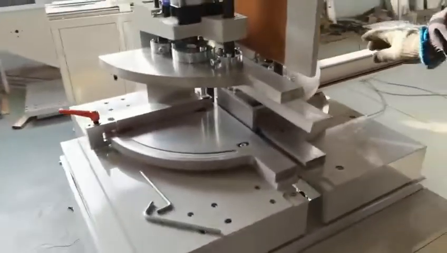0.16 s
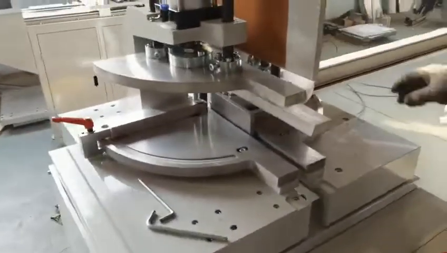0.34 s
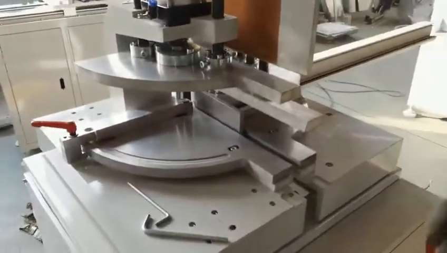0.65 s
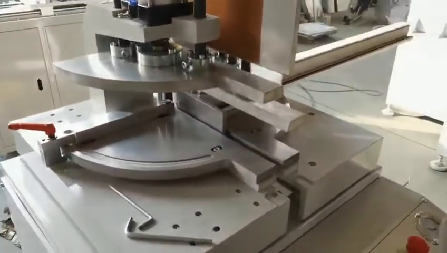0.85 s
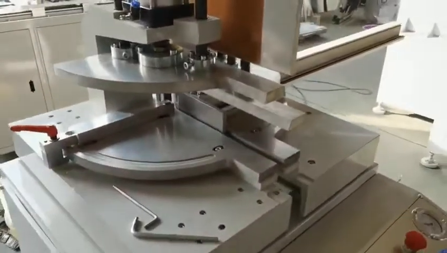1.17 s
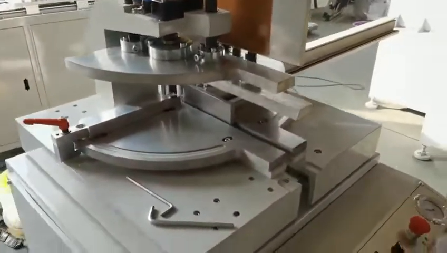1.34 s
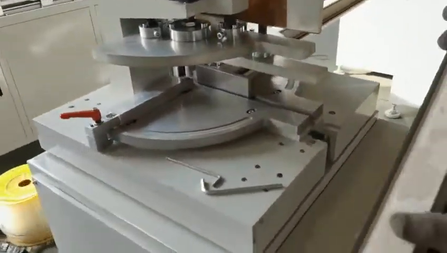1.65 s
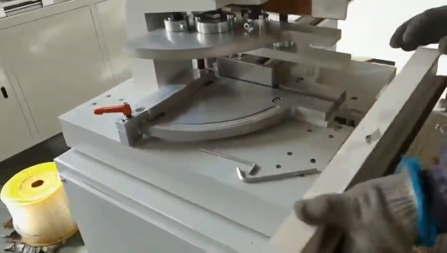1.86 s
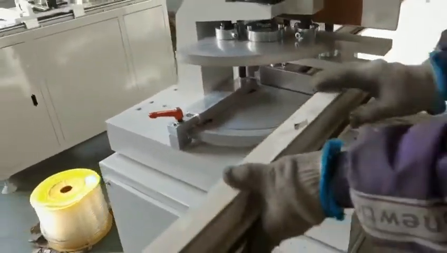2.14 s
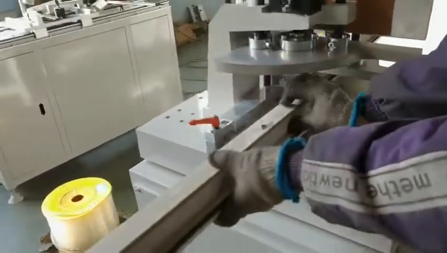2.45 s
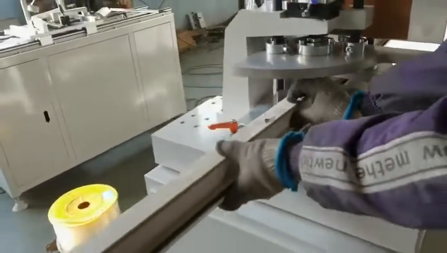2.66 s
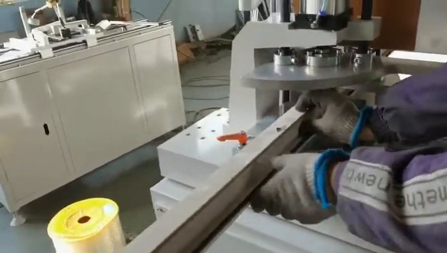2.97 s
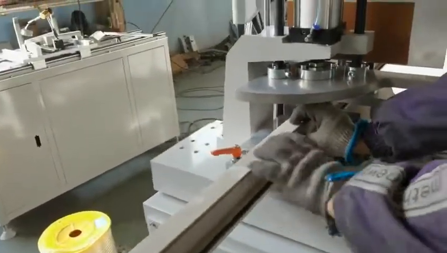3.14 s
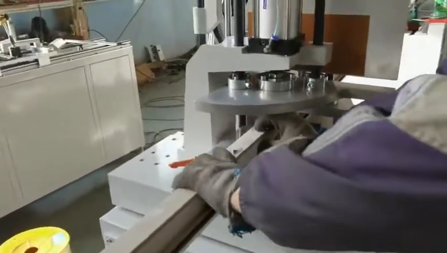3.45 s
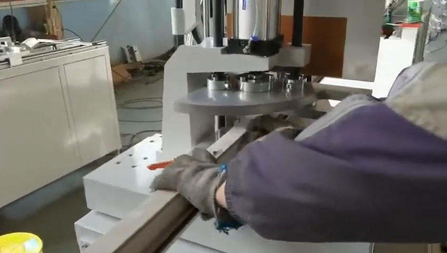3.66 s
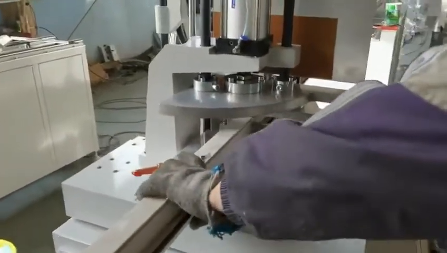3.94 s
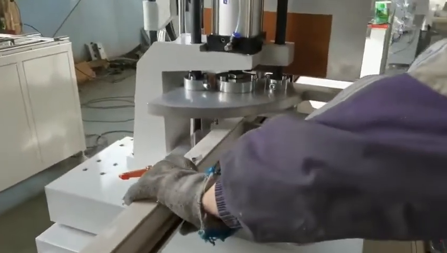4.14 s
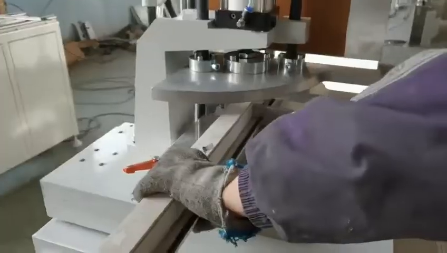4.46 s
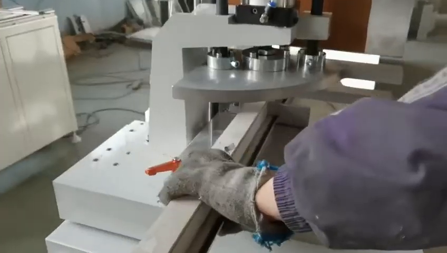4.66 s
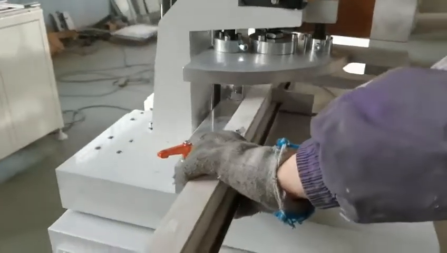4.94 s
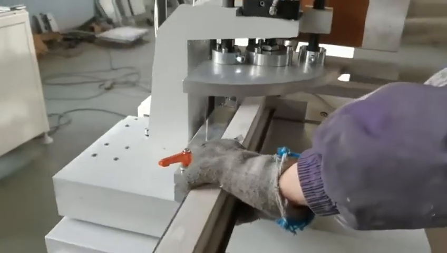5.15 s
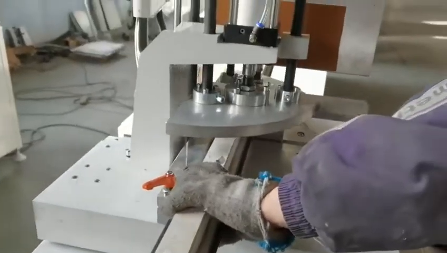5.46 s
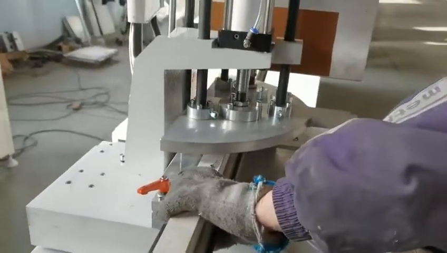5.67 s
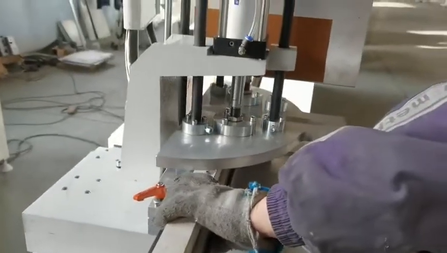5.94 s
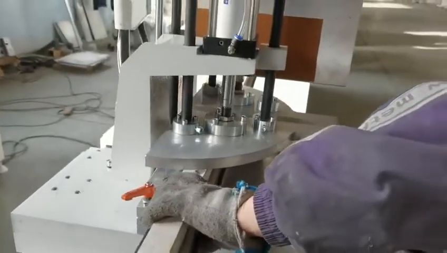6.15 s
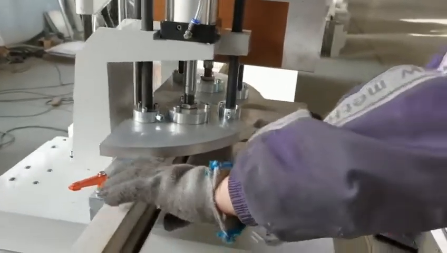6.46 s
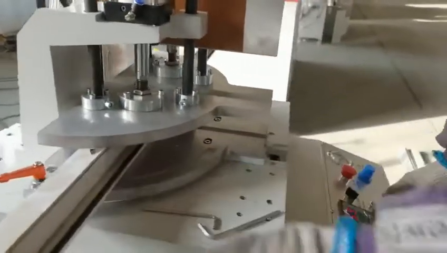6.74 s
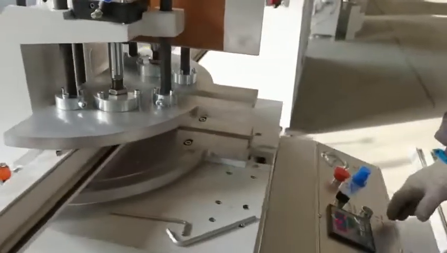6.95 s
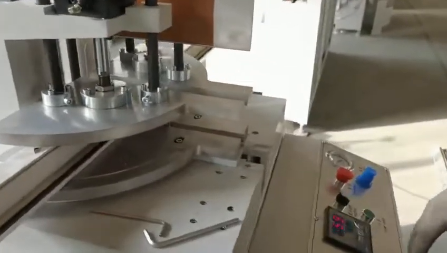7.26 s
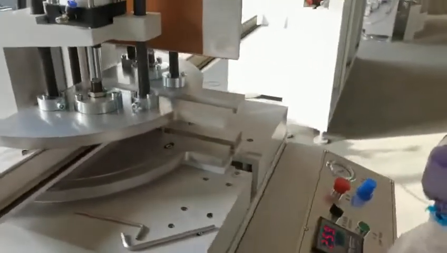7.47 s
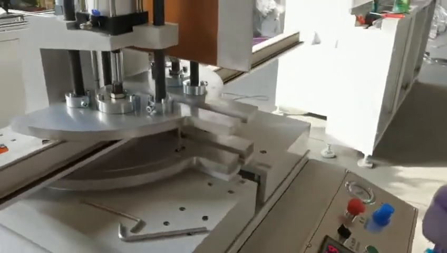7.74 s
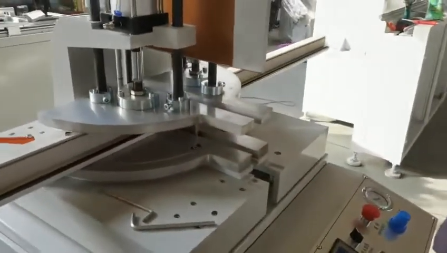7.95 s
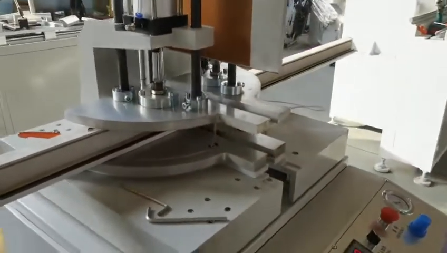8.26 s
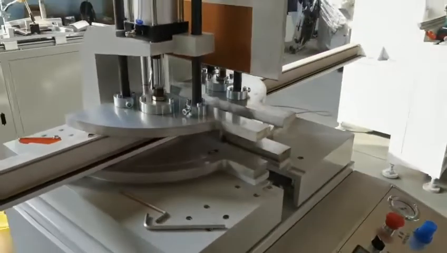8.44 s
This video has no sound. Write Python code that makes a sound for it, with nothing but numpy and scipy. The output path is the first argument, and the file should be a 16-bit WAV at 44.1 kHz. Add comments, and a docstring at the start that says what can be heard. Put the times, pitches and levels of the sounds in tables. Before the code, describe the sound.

Close up in a rumbling workshop, a metal bar scrapes and clacks into place before valves thump, air blasts hiss and pistons clunk.

```python
"""A pneumatic press for window profiles cycles in a large workshop, heard by a phone close by.
Valves thud as damped modes and vent coloured noise that dies away; pistons clunk as struck modes
plus rattling noise. A hollow profile rasps over the table (grainy noise) and knocks on it (a crack
and ringing modes). A fitting leaks, the hall rumbles in noise bands, a far tool whirrs in narrow ones."""
import sys
import numpy as np
from scipy import signal
from scipy.fft import rfft, irfft
from scipy.io import wavfile
from scipy.ndimage import uniform_filter1d, minimum_filter1d

SR = 44100
rng = np.random.default_rng(int(sys.argv[2]) if len(sys.argv) > 2 else 0)


def makeup_ratio(level_db):
    """Linear amplitude ratio for a level in decibels (20 dB per factor of ten)."""
    decades = np.asarray(level_db, float) / 20
    return 10 ** decades


def store_wav(level_fs):
    """Save 16-bit WAV to argv[1]."""
    pcm = np.round(np.clip(np.atleast_2d(level_fs), -1, 1) * 32767)
    wavfile.write(sys.argv[1], SR, pcm.T.astype(np.int16))


N = 379260
HZ = np.maximum(np.fft.rfftfreq(N, 1 / SR), 1)
TIME = np.arange(N) / SR

# air seeping from a fitting: (time [s], level [dB])
LEAK_LEVEL = [(0, -67), (.4, -48), (1, -41.5), (1.9, -48), (2.85, -49.5), (5.9, -32.5), (6.85, -31.5),
              (7.1, -35.5), (8, -38), (8.6, -47)]
# colour of the seeping air: (frequency [Hz], relative density [dB per Hz])
LEAK_COLOUR = [(1060, -59), (1800, -27), (2080, -12.5), (2330, -17.5), (2980, -12.5), (3670, -14),
               (6070, -6), (7560, -7), (8520, 2), (11600, -24.5), (16000, -35)]
# gloves and profile rubbing over the table:
# (hardest at [s], build-up [s], let-off [s], bright rasp [dB], dull rasp re bright [dB])
STROKES = [(.22, .02, 0.15, -50, -29), (.505, 0.026, 0.05, -27, -15), (.79, 0.046, 0.074, -38, -42),
           (.92, 0.028, 0.15, -41.5, -24), (1.19, 0.034, 0.07, -27, -10.5),
           (1.662, 0.049, 0.036, -22.5, -26), (1.745, 0.038, 0.026, -30, -8.5),
           (2.127, 0.018, 0.021, -32.5, -23), (2.35, 0.027, 0.045, -36, -21),
           (2.45, 0.049, 0.049, -41, -5.5), (2.56, 0.023, 0.054, -43, -8), (2.64, .02, 0.028, -37.5, -3),
           (6.8, 0.04, 0.075, -32.5, -24), (6.921, 0.014, 0.033, -24.5, -8), (7.16, 0.033, 0.033, -45, -23),
           (7.71, 0.025, 0.053, -32, -7.5)]
# profile dragged so that it rings: (hardest at [s], build-up [s], let-off [s], level [dB])
DRAGS = [(.514, 0.015, .05, -54.5), (1.19, 0.031, 0.092, -31), (2.348, .015, 0.027, -42.5),
         (2.5, 0.011, 0.009, -37.5), (2.6, 0.036, 0.069, -41.5), (6.936, 0.005, 0.011, -42.5)]
# colour of rubbing and of cracks: (frequency [Hz], relative density [dB per Hz])
RASP_COLOUR = [(880, -41), (1500, -29), (1830, -18.5), (2460, -12.5), (3280, -18.5), (4000, -13.5),
               (5440, -6.5), (7030, -12), (8400, 0), (10900, -22), (11700, -33.5), (14200, -34.5),
               (16000, -42)]
# where hands and fitting lie as the phone moves: (time [s], left re right [dB])
CLOSE_PAN = [(0, 0), (.8, -4), (1.2, -0.5), (1.7, -1.5), (2.5, 0.5), (6.5, -0.5), (6.9, -0.5), (8, 0.5)]
# work in the hall: (time [s], level change [dB])
BUSY = [(0, 2), (1, 6), (1.9, 0), (2.8, 4.5), (4.1, 5.5), (5.4, -1.5), (6.3, -1.5), (6.9, 4.), (7.5, 1),
        (8.6, 3.5)]
# colour of the hall noise: (frequency [Hz], relative density [dB per Hz])
HALL_COLOUR = [(15, -34), (25, -38), (54, 4), (82, 0.5), (209, -7), (375, -13), (546, -11.5), (1010, -16.5),
               (1290, -10.5), (1500, -12.5), (1950, -9.5), (3300, -120)]
# swells of a far tool: (loudest at [s], build-up [s], let-off [s], level [dB], pitch [Hz])
WHIRR = [(.12, .12, 0.095, -58, 1290), (.4, 0.033, 0.37, -53, 2600), (.64, .11, 0.16, -45.5, 1780),
         (.97, 0.064, .07, -61, 2730), (2.79, 0.028, 0.15, -48.5, 1126), (4.21, .015, .26, -42.5, 1258),
         (4.22, .02, 0.3, -52, 1042), (6.6, .03, .1, -50, 1240), (7.62, .05, 0.082, -50.5, 1535)]
# profile knocking on steel:
# (time [s], relative level [dB], crack re level [dB], left re right [dB], hardness [dB per octave])
KNOCKS = [(0.398, -36, 9, -11, 9.5), (1.112, -9.5, 18, 0, -14), (1.919, -43, 16, -3, -5),
          (2.308, -15, 8.5, 0.5, 10), (2.332, -19, -7, 5, -6), (2.347, -21, 10, -6, -5),
          (2.443, -28.5, 10, -9, -3), (2.494, -16.5, 0, 1, -6), (2.558, -21.5, -8, -2, -22),
          (2.626, -9.5, 7.5, -5, 9), (6.892, -38, 38, -4, -6), (6.913, -35.5, 33, -11, -8),
          (7.954, -36, 27, -4, -9)]
# modes of the profile: (frequency [Hz], width before damping [Hz], relative level [dB])
PROFILE_MODES = [(245, 51, 2), (540, 49, -19), (807, 66, -5.5), (940, 29, -3), (1296, 160, 0),
                 (1620, 160, -1), (2000, 67, -1), (2460, 13, -11.5), (2630, 17, -9.5), (3600, 83, -15)]
# valves and pistons shaking frame and floor:
# (time [s], relative level [dB], pitch [Hz], t60 [s], rise time constant [s])
BOOMS = [(.882, -50, 151, 0.27, .005), (1.185, -26, 245, 0.29, 0.0063), (2.854, -22, 161, 0.43, 0.0021),
         (2.853, -24, 230, 0.11, 0.0012), (2.929, -25.5, 250, 0.21, 0.0064),
         (3.33, -27, 518.5, 0.29, 0.0092), (3.322, -27, 240, 0.41, 0.0087), (3.345, -26, 109, 0.22, 0.009),
         (3.83, -16, 150, 0.2, 0.0016), (3.87, -19.5, 282, 0.37, 0.013), (3.86, -30, 400, 0.33, .02),
         (2.856, -34, 380, 0.15, 0.024), (3.989, -29.5, 210, 1, 0.085), (4.884, -26.5, 165, 0.17, 0.0043),
         (5.766, -31.5, 290.6, 0.19, 0.0043), (5.77, -36, 450, .2, .006), (5.78, -23.5, 99.6, 0.28, 0.016),
         (6.738, -32, 106, 0.44, 0.0048), (6.76, -34, 561, 0.19, 0.0071), (7.956, -22, 159.4, 0.075, 0.003),
         (8.085, -29, 246, 0.4, 0.0055), (8.311, -24.5, 300, 0.66, 0.0064), (8.394, -13, 255, 0.14, 0.004),
         (8.37, -28.5, 85, .7, 0.016), (8.42, -22.5, 147, 0.63, 0.0095)]
# valves opening: (time [s], spit [dB], spit let-off [s], surge [dB], surge t60 [s])
VENTS = [(2.852, -30, 0.013, -8, 0.42), (3.832, -27, 0.0087, -10, 0.64), (4.888, -9, 0.026, -28, 0.52),
         (7.969, -11.5, 0.019, -17, 0.93)]
# each cylinder emptying through its silencer:
# (hiss [dB], silencer ring [dB], roar [dB], sag [dB per s], runs dry at [s])
EMPTYING = [(-23.5, -31.5, -36, 3.5, 3.83), (-19, -26, -32.5, 8, 4.885), (-16.5, -25.5, -35, 4, 5.84),
            (-48, -23.5, -47, 15, 8.45)]
# extra fall once dry, cut off by the next valve or left to die: one per vent [dB per s]
RUN_DRY_DB_PER_S = [900, 920, 40.7, 114]
# silencer whistles, one list per vent: (frequency [Hz], width [Hz], level over the air noise [dB])
WHISTLES = [
    [(5150, 250, 3.5), (6180, 300, 3), (8480, 400, 2)],
    [(4300, 200, 2), (6100, 500, 2), (8600, 400, 1.5)],
    [(4750, 300, 3), (5400, 150, 3), (6030, 150, 4), (6600, 200, 2), (8880, 150, 2), (9380, 100, 3)],
    [(4300, 200, 4), (4860, 120, 4), (5170, 220, 6), (5900, 500, 2), (6600, 120, 3), (7200, 120, 3),
     (8560, 120, 2.5)],
]
# position of each exhaust: left re right [dB]
VENT_PAN_DB = [0.25, 0.96, -0.09, -1.6]
# colour of the vented air: (frequency [Hz], relative density [dB per Hz])
AIR_COLOUR = [(710, -36), (1200, -11.5), (1790, -16.5), (1930, -11.5), (2060, -11.5), (2230, -11),
              (3250, -11.5), (3870, -14.5), (5350, -9.5), (7410, -10.5), (8630, -4), (11100, -21.5),
              (11800, -28), (15200, -32.5), (16000, -48)]
# pistons meeting their stops:
# (time [s], relative level [dB], treble re level [dB], dull rattle t60 [s], hardness [dB per octave])
CLANKS = [(3.313, -21, 10, 0.12, 0.5), (5.76, -30, 3, 0.11, -7), (6.737, -37.5, -19, 0.41, -7),
          (7.956, -58, 31, 0.4, -22), (8.08, -21, 13.5, 0.39, 4), (8.096, -24, 7.5, 0.19, -6),
          (8.386, -28, 11, .12, 0.), (8.398, -21, -2, 0.25, -14)]
# modes of the steel frame: (frequency [Hz], width before damping [Hz], relative level [dB])
FRAME_MODES = [(560, 77, -4), (905, 120, -12), (1470, 100, -8), (1990, 120, -27), (1900, 44, 3.5),
               (2370, 57, -7), (2660, 50, -22), (2640, 42, 3), (3100, 41, -1), (4160, 55, -16),
               (4230, 33, 10), (4600, 100, 10), (5030, 57, 0)]
# likeness of the ports in diffuse noise: (frequency [Hz], left-right correlation [0-1])
LIKENESS = [(60, 0.98), (180, 0.96), (550, 0.69), (1650, 0.026), (4970, 0.018), (15000, 0.01)]
# colour difference of the ports: (frequency [Hz], left re right [dB])
PORT_BALANCE = [(60, 0), (200, 0.9), (380, 1), (700, 2), (1290, 0), (2380, -1.5), (3400, 0), (4700, -4.5),
                (6000, -4.5), (7100, -4), (8000, -0.5), (9200, 0), (11000, 4.5), (13000, -10.5)]

RESTING_DB, RESTING_DULL_DB = -55, -2.5   # light contact between strokes; its dull part re bright
RUMBLE_DB, DRONE_DB, MURMUR_DB = -53.5, -55, -55
MURMUR_FOLLOWS = 0.51   # share of the BUSY dB
WHIRR_WIDTH_HZ = 186
OPENING_S, ROAR_BUILDS_S = 0.034, 0.038   # time constants
SPIT_ATTACK_S, SPUTTER_DB = 0.001, 2
SURGE_RING_DB, SURGE_ROAR_DB, SURGE_WASH_DB = -15.5, -16.5, -26   # shares of spit and surge
ECHO_T60_S = 0.07
HALL_T60_S, HALL_DB = 0.79, -12
LIMIT_DB, RELEASE_DB_PER_S = -4, 114


def rms_one(x):
    """Scale to unit power."""
    return x / np.sqrt(np.mean(x ** 2) + 1e-20)


def in_time(rows):
    """Read a (time, value) curve at every sample."""
    return np.interp(TIME, *np.transpose(rows))


def at_hz(points):
    """Read a (frequency, value) table on the frequency grid, log-spaced."""
    hz, value = np.transpose(points)
    return np.interp(np.log(HZ), np.log(hz + 1), value)


def drift(rate_hz):
    """Slow random wandering, spread 1: noise through two poles, run at SR / 40."""
    r = np.exp(-2 * np.pi * rate_hz * 40 / SR)
    slow = signal.lfilter([1], [1, -2 * r, r * r], rng.standard_normal(N // 40 + 2002))
    slow = rms_one(slow[2000:])
    return np.interp(np.arange(N) / 40, np.arange(len(slow)), slow)


def swell(s, build_s, let_off_s):
    """Bell-shaped push: builds up to s, then lets off."""
    return np.exp(-.5 * ((TIME - s) / np.where(TIME < s, build_s, let_off_s)) ** 2)


def burst(s, t60_s, rise_s):
    """Envelope that rises quickly at s and dies exponentially."""
    after = np.maximum(TIME - s, 0)
    return (1 - np.exp(-after / rise_s)) * makeup_ratio(-60 * np.minimum(after / t60_s, 3))


def panned(x, pan_db):
    """Shift level between left and right."""
    return x * makeup_ratio(pan_db * np.array([[.5], [-.5]]))


def diffuse(near, grain_db=0):
    """Spectrum of stereo noise: a near share via short echoes off the machine, the rest hall field."""
    white = rfft(rng.standard_normal((3, N)) * makeup_ratio(grain_db * rng.standard_normal(N)))
    size = round(2 * ECHO_T60_S * SR)
    echoes = rng.standard_normal((2, size)) * makeup_ratio(-60 * TIME[:size] / ECHO_T60_S)
    echoes = rfft(echoes / np.sqrt(np.sum(echoes ** 2, axis=1, keepdims=True)), N)
    echoes = echoes / np.abs(echoes) ** .4   # many paths even out the deepest ripples
    mid, side = np.sqrt(near) * white[0] * echoes + np.sqrt(1 - near) * white[1:]
    alike = np.clip(at_hz(LIKENESS), 0, .99)
    return np.sqrt(1 + alike) * mid + np.sqrt(1 - alike) * side * [[1], [-1]]


def band(noise, gain, low_hz, high_hz):
    """Coloured noise within a band, scaled to unit power."""
    inside = 1 / np.sqrt((1 + (low_hz / HZ) ** 12) * (1 + (HZ / high_hz) ** 12))
    return rms_one(irfft(noise * gain * inside, N))


def resonances(peaks, base_db):
    """Magnitude of a set of peaks over a flat base."""
    gain = makeup_ratio(base_db)
    for hz, wide_hz, db in peaks:
        gain = gain + makeup_ratio(db) / np.sqrt(1 + (2 * (HZ - hz) / wide_hz) ** 2)
    return gain


def ring(clicks, hz, t60_s):
    """Two-pole resonator: a unit click starts a decaying sine of height 1."""
    r, w = makeup_ratio(-60 / (t60_s * SR)), 2 * np.pi * hz / SR
    return signal.lfilter([0, np.sin(w)], [1, -2 * r * np.cos(w), r * r], clicks + 1e-18)


def strike(peaks, times_s, levels_db, hardness, damping, spread_db):
    """Blows excite modes, unequally per port; hardness tilts the treble, width and damping set t60."""
    at, out = (np.array(times_s) * SR).astype(int), np.zeros((2, N))
    chance = rng.standard_normal((len(at), len(peaks), 2))
    lags = rng.integers(0, 36, (len(at), len(peaks)))   # contact spreads over a millisecond
    for k, (hz, wide_hz, db) in enumerate(peaks):
        strength_db = levels_db + db + hardness * np.log2(hz / 1000) + spread_db * chance[:, k].T
        clicks = np.zeros((2, N))
        clicks[:, at + lags[:, k]] = makeup_ratio(strength_db) * (-1) ** k   # alternate polarity
        out += ring(clicks, hz, np.log(1000) / (np.pi * (wide_hz + damping * hz)))
    return out


def leak():
    """Thin hiss of air seeping from a fitting, heard between the exhausts."""
    level = makeup_ratio(in_time(LEAK_LEVEL) + 0.13 * drift(24))
    return level * band(diffuse(near=0.88), makeup_ratio(at_hz(LEAK_COLOUR)), 2000, 18000)


def slides():
    """Stick-slip rubbing as grainy noise: bright and dull rasp, and the hollow profile ringing along."""
    resting = makeup_ratio(RESTING_DB + 1.34 * drift(3.5))
    rasp, dull_rasp, drag = resting, resting * makeup_ratio(RESTING_DULL_DB), 0
    for s, build_s, let_off_s, db, dull_db in STROKES:
        push = makeup_ratio(db) * swell(s, build_s, let_off_s)
        rasp = rasp + push
        dull_rasp = dull_rasp + push * makeup_ratio(dull_db)
    for s, build_s, let_off_s, db in DRAGS:
        drag = drag + makeup_ratio(db) * swell(s, build_s, let_off_s)
    noise, colour = diffuse(near=0.39, grain_db=4.0), makeup_ratio(at_hz(RASP_COLOUR))
    bright = band(noise, colour, 5670, 19000) * makeup_ratio(0.93 * drift(48))
    dull = band(noise, colour, 1050, 3470) * makeup_ratio(1.9 * drift(49))
    # rubbing reaches the low modes
    soft = resonances(PROFILE_MODES, base_db=-28) ** 1.57 / (1 + (HZ / 1100) ** 2)
    return rasp * bright + dull_rasp * dull + drag * band(noise, soft, 223, 1500)


def hall_noise():
    """Rumble and drone of compressors and murmur of far machines: three wandering noise bands."""
    busy_db = in_time(BUSY)
    noise, colour = diffuse(near=0.16), makeup_ratio(at_hz(HALL_COLOUR))
    rumble = makeup_ratio(RUMBLE_DB + busy_db + 1.5 * drift(0.6)) * band(noise, colour, 25, 160)
    drone = makeup_ratio(DRONE_DB + busy_db + 0.81 * drift(2.6)) * band(noise, colour, 139, 351)
    murmur = makeup_ratio(MURMUR_DB + MURMUR_FOLLOWS * busy_db) * band(noise, colour, 432, 2700)
    return rumble + drone + murmur


def whirr():
    """Far tool: low-pass noise shifted up to a narrow band at each pitch, independent per port."""
    lowpass = signal.butter(2, WHIRR_WIDTH_HZ / 2, fs=SR, output="sos")
    low = signal.sosfilt(lowpass, rng.standard_normal((2, 2, N)))
    out = np.zeros((2, N))
    for s, build_s, let_off_s, db, hz in WHIRR:
        phase = 2 * np.pi * hz * TIME
        tone = low[0] * np.cos(phase) + low[1] * np.sin(phase)
        out += makeup_ratio(db) * swell(s, build_s, let_off_s) * tone
    return out / np.std(low)


def knocks():
    """Profile hits steel: a short noise crack, ringing modes and a settling rattle."""
    noise = rng.standard_normal((2, N))
    near = rfft(.5 * noise[0] + noise)   # close contact: partly the same in both ports
    s, level_db, crack_db, pan_db, hardness = np.transpose(KNOCKS)
    sides_db = level_db + pan_db * np.array([[.5], [-.5]])
    cracks, settling = np.zeros((2, N)), np.zeros((2, N))
    for k in range(len(s)):
        side_db = sides_db[:, [k]]
        cracks += makeup_ratio(side_db + crack_db[k] - 16) * burst(s[k], 0.041, rise_s=0.00025)
        settling += makeup_ratio(side_db - 13.0) * burst(s[k], 0.069, rise_s=0.0024)
    crack = cracks * band(near, makeup_ratio(1.15 * at_hz(RASP_COLOUR)), 3900, 16000)
    modes = strike(PROFILE_MODES[1:], s, sides_db - 15, hardness, damping=0.041, spread_db=5.0)
    rattle = settling * band(near, resonances(PROFILE_MODES, base_db=-19), 390, 4700)
    return crack + modes + rattle


def hall(x):
    """Diffuse echoes: a dying noise of its own for each port, duller than the source."""
    tail = band(diffuse(near=0), 1 / np.sqrt(1 + HZ / 2500), 60, 6600)
    tail = (tail * burst(0.0012, HALL_T60_S, rise_s=0.0034))[:, :SR]
    tail = tail / np.sqrt(np.sum(tail ** 2) / 2)
    return signal.fftconvolve(x.mean(axis=0, keepdims=True), tail, axes=1)[:, :N]


def booms():
    """Thuds of frame and floor: a sine mode, its level wavering, amid a rumble around its pitch."""
    noise, out = diffuse(near=0.42), np.zeros((2, N))
    waver = drift(9.7)
    for s, db, hz, t60_s, rise_s in BOOMS:
        around = band(noise, resonances([(hz, .5 * hz, 0)], base_db=-25), 87, 418)
        waver_db = 3.2 * waver * np.clip((TIME - s) / 0.04, 0, 1)
        mode = np.sin(2 * np.pi * hz * (TIME - s)) * makeup_ratio(waver_db)
        out += makeup_ratio(db) * (.5 * mode + 0.45 * around) * burst(s, t60_s, rise_s)
    return out


def vents():
    """Turbulent jets: spit and surge on a flow that sags, then runs dry; hiss, ring, roar, wash."""
    out, gust_db = np.zeros((2, N)), 0.11 * drift(16)
    for vent, emptying, dying, whistles, pan_db in zip(
            VENTS, EMPTYING, RUN_DRY_DB_PER_S, WHISTLES, VENT_PAN_DB):
        s, spit_db, spit_s, surge_db, t60_s = vent
        hiss_db, ring_db, roar_db, sag, dry_s = emptying
        after = np.maximum(TIME - s, 0)
        flow_db = -sag * after - dying * np.maximum(TIME - dry_s, 0)
        flow = makeup_ratio(flow_db) * (1 - np.exp(-after / OPENING_S))
        spit = makeup_ratio(spit_db + SPUTTER_DB * drift(150))
        spit = spit * swell(s + 2 * SPIT_ATTACK_S, SPIT_ATTACK_S, spit_s)
        surge = spit + makeup_ratio(surge_db) * burst(s, t60_s, rise_s=OPENING_S)
        builds = 1 - np.exp(-after / ROAR_BUILDS_S)
        noise, air_db = diffuse(near=0.74), at_hz(AIR_COLOUR)
        for hz, wide_hz, db in whistles:
            air_db = air_db + db / (1 + (2 * (HZ - hz) / wide_hz) ** 2)
        air = makeup_ratio(air_db)
        hiss = band(noise, air, 7880, 19600) * (makeup_ratio(hiss_db) * flow + surge)
        silencer = band(noise, air, 4200, 6500) * (makeup_ratio(ring_db) * flow + makeup_ratio(SURGE_RING_DB) * surge)
        roar = band(noise, air, 1660, 3770) * (makeup_ratio(roar_db) * flow + makeup_ratio(SURGE_ROAR_DB) * surge)
        wash = band(noise, 1, 380, 1250) * makeup_ratio(SURGE_WASH_DB) * surge
        jet = hiss + silencer + (roar + wash) * builds
        out += panned(jet, pan_db) * makeup_ratio(gust_db + .5 * drift(36))
    return out


def clanks():
    """Pistons on their stops: frame modes ring, noise rattles briefly, its treble first to die."""
    s, level_db, treble_db, t60_s, hardness = np.transpose(CLANKS)
    noise, frame = diffuse(near=0.34), resonances(FRAME_MODES, base_db=-8.5)
    low = [mode for mode in FRAME_MODES if 400 < mode[0] < 1500]
    high = [mode for mode in FRAME_MODES if mode[0] >= 1500]
    out = strike(low, s, level_db - 4.0, hardness, damping=0.07, spread_db=10.0)
    out += strike(high, s, level_db + treble_db - 21, hardness, damping=.06, spread_db=3.5)
    dull, bright = np.zeros(N), np.zeros(N)
    for at, db, more_db, t60 in zip(s, level_db, treble_db, t60_s):
        dull += makeup_ratio(db - 6.5) * burst(at, t60, rise_s=0.0017)
        bright += makeup_ratio(db + more_db - 9.0) * burst(at, .5 * t60, rise_s=0.001)
    return out + dull * band(noise, frame, 465, 1690) + bright * band(noise, frame, 740, 5700)


def limiter(x):
    """Gain ducks a few milliseconds ahead of loud peaks and recovers at a steady rate."""
    over_db = np.maximum(20 * np.log10(np.abs(x).max(axis=0) + 1e-9) - LIMIT_DB, 0)
    release_db = RELEASE_DB_PER_S * TIME
    held_db = np.maximum.accumulate(over_db + release_db) - release_db
    ahead_db = -minimum_filter1d(-held_db, size=441)
    return x * makeup_ratio(-.6 * uniform_filter1d(ahead_db, size=221))   # takes off 0.6 of the excess dB


def scene():
    """Blows sound in the hall; the noises are diffuse already."""
    blows = knocks() + clanks() + booms()
    close = panned(leak() + slides(), in_time(CLOSE_PAN))
    return blows + makeup_ratio(HALL_DB) * hall(blows) + vents() + close + whirr() + hall_noise()


def band_limit(x):
    """A steep low-pass at the top of the band."""
    return signal.sosfilt(signal.butter(12, 16960, fs=SR, output="sos"), x)


def record(dry):
    """Peaks are limited; the two ports differ in colour; the top is cut at 15950 Hz."""
    tilt = panned(1, at_hz(PORT_BALANCE)) * (HZ < 15950)
    ports = irfft(rfft(limiter(dry)) * tilt, N)
    return band_limit(ports)


dry = scene()
out = record(dry)
store_wav(out)
```